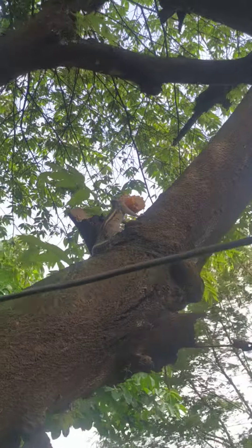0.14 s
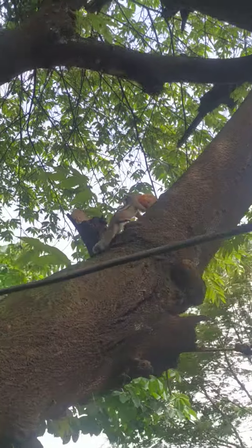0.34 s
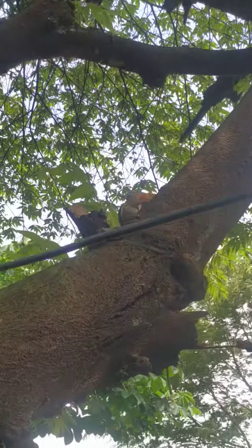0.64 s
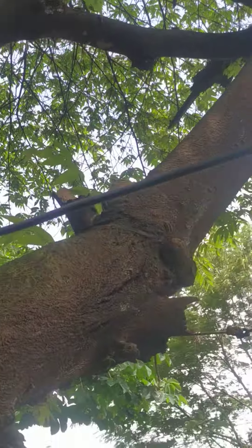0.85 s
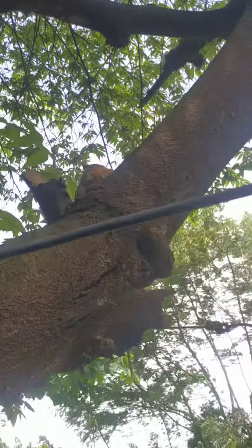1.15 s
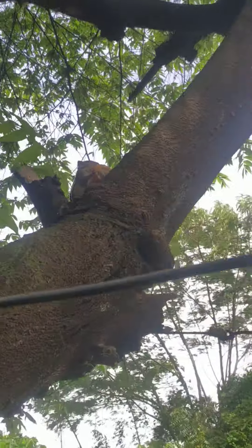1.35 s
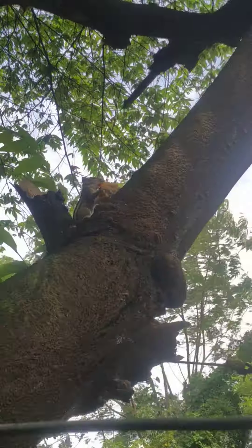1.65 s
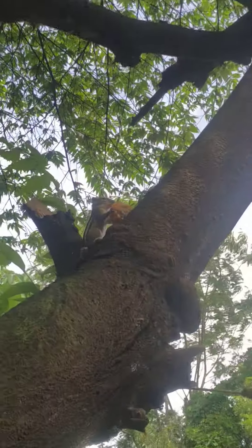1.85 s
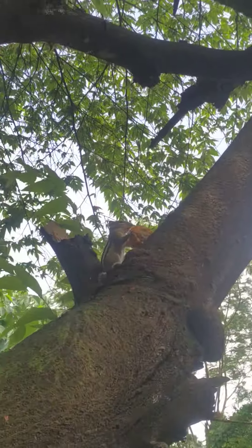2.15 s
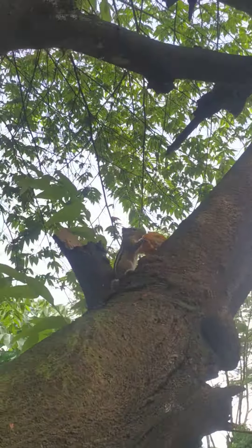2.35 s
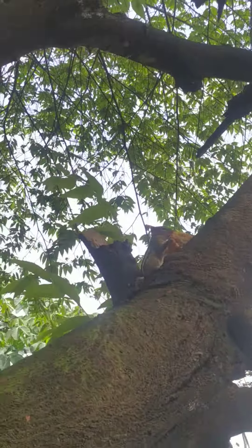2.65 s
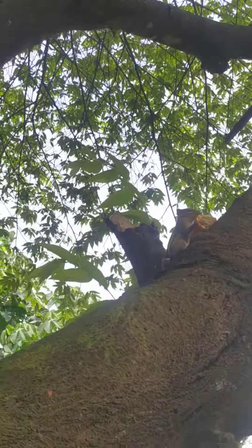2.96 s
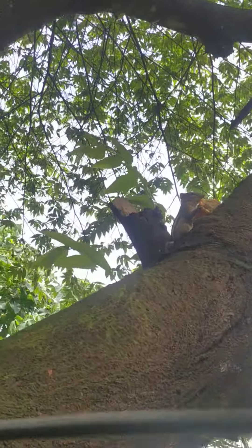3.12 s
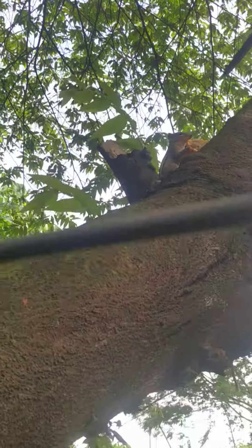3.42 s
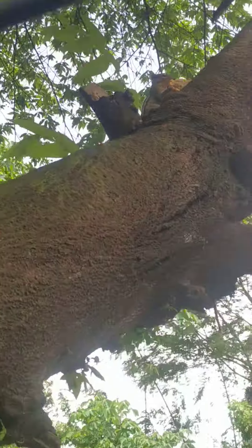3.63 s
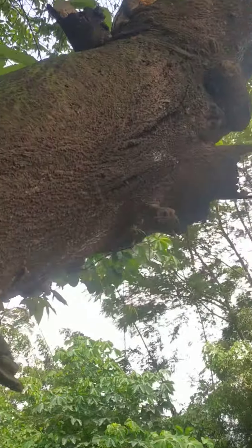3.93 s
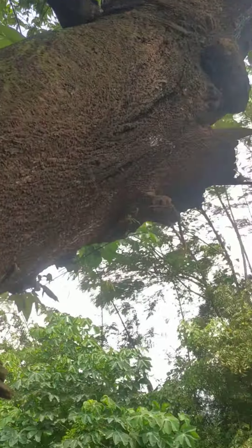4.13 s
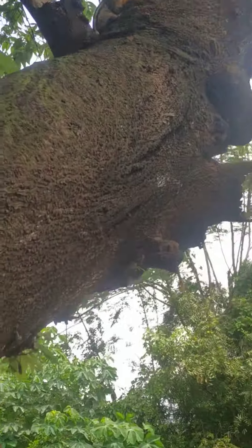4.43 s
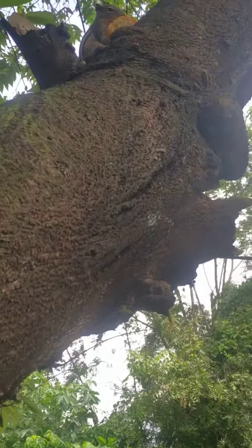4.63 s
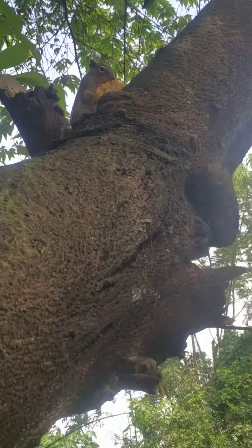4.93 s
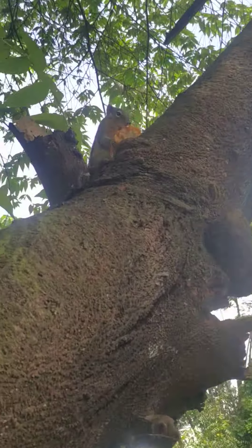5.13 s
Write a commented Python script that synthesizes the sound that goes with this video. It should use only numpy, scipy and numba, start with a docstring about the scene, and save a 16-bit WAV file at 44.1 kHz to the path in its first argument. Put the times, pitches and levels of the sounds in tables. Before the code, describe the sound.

A soft outdoor hush of far traffic and leaves runs throughout, with a faint, thin bird whistle early on. A squirrel in a tree then gives three short, harsh calls, evenly spaced, each a fast rattle with a breathy hiss. The distant bird whistles again, and a finger knocks sharply on the handheld phone and briefly rubs its case, while light wind buffets the microphone toward the end.

```python
"""Three harsh, rattling squirrel calls from a tree, over a soft outdoor hush and a small, far bird.
Tissue slapping shut in the squirrel's throat makes the rattle; air past its teeth adds the hiss.
The microphone is a phone, moved about in the hand: air buffets its two ports, and a finger
knocks beside the right one and rubs the case. Far traffic and leaves make the hush."""
import sys
import numpy as np
from scipy import signal
from scipy.fft import rfft, irfft
from scipy.io import wavfile
from scipy.ndimage import uniform_filter1d
from numba import njit

SR = 44100
rng = np.random.default_rng(int(sys.argv[2]) if len(sys.argv) > 2 else 0)


def persist_wave(psi):
    """Save psi, clipped to +-1, as 16-bit WAV."""
    counts = np.round(np.clip(psi, -1, 1) * 32767).astype(np.int16)
    wavfile.write(sys.argv[1], SR, np.atleast_2d(counts).T)


N = 233020
T = np.arange(N) / SR
FREQS = np.fft.rfftfreq(N, 1 / SR)
SIDES = np.array([[.5], [-.5]])  # splits a left-minus-right difference between the ports


def squirrel(effort_peak=0.59, slack_rough=0.6, hiss_follow=0.77, lead_in_db=-3, catch_s=0.011):
    """The calls at the animal's mouth: one arch of effort drives rattle and hiss; slack is rougher."""
    # calls: t/s, length/s, airy lead-in/s, rattle level/dB, hiss level/dB, drop at slack effort/dB,
    # roughness/0-1, teeth resonance f/Hz, its gain/ratio, brightness/dB
    squirrel_calls = [(2.013, 0.356, 0.035, -36, -46, -4.5, 0.1, 4740, 0.85, 2),
                      (2.731, 0.34, 0.061, -38, -46, -1, 0.12, 4330, 2.4, -4.5),
                      (3.554, 0.34, 0.011, -32.5, -42, -8, 0.04, 4404, 0.44, 1.5)]
    calls = np.array(squirrel_calls)
    nearest_call = np.abs(T - (calls[:, :1] + calls[:, 1:2] / 2)).argmin(axis=0)
    (start, length, lead_in, rattle_db, hiss_db, drop_db, rough,
     teeth_hz, teeth_gain, bright_db) = calls[nearest_call].T
    t = T - start
    slack = np.interp(t / length, [0, effort_peak, 1], [1, 0, 1]) ** 1.51
    pulses, airflow = throat_pulses(np.clip(rough + slack_rough * slack, 0, 1))
    rattle = throat_and_mouth(pulses, nearest_call)
    rattle *= swell(t, length, attack_s=0.066, release_s=0.066)
    hiss = teeth_hiss(airflow, teeth_hz, teeth_gain, bright_db)
    hiss *= swell(t, length, attack_s=0.056, release_s=0.099)
    catch_db = np.interp(t - lead_in, [0, catch_s], [lead_in_db, 0])  # the rattle starts weak
    return (rattle * undb(rattle_db + catch_db + drop_db * slack)
            + hiss * undb(hiss_db + hiss_follow * drop_db * slack))


def throat_pulses(rough, jitter=0.012, scatter_db=0.5, puff_cycles=0.93, rasp=4.3):
    """Tissue slaps shut about 80 times a second; gives rough pulses and the airflow beating with them."""
    # slap rate, one curve per call: t/s, f/Hz
    pulse_rate = [
        [(2.08, 79.26), (2.13, 79.26), (2.224, 80.3), (2.29, 77.87)],
        [(2.8, 79.83), (2.86, 82.43), (2.9, 82.5), (2.945, 80.8)],
        [(3.62, 79.8), (3.67, 83.3), (3.742, 83.7), (3.79, 83.5)],
    ]
    # two weaker rebounds after each slap: delay/cycles, size/ratio
    rebounds = [(0.184, 0.17), (0.478, 0.42)]
    rate_hz, = curves(np.vstack(pulse_rate))
    phase = np.cumsum(rate_hz * (1 + jitter * rough * walk(80))) / SR
    cycle = phase.astype(int)
    size = undb(scatter_db * rng.standard_normal(cycle[-1] + 1))[cycle]
    bounces = sum(gain * np.diff(np.floor(phase - at), prepend=-1) for at, gain in rebounds)
    slaps = np.diff(cycle, prepend=0) + bounces
    puff = np.exp(-(phase % 1) / puff_cycles)
    breath = unit(puff * rng.standard_normal(N))
    return size * (unit(slaps) + rasp * rough * breath), size * puff


def throat_and_mouth(pulses, nearest_call, mouth_width_hz=330.0):
    """The pulses ring the throat, shaped anew for each call, and the mouth near 2 kHz."""
    # colour of the rattle: f/Hz, level/dB
    throat_colour = [(350, -28.5), (550, -13.5), (800, -4.5), (1050, -8.5), (1250, -7.5), (1580, -4),
                     (1730, -1), (2050, -0.5), (2380, -3.5), (2650, -13.5), (3300, -20), (6000, -60)]
    # four throat resonances, one row per call: f/Hz, boost/dB
    throat_peaks = [
        [(900, 2), (1380, 2), (1800, 1.5), (2230, 2)],
        [(850, -4), (1420, 4), (1870, 1.5), (2200, 1)],
        [(860, 1.5), (1380, 6.5), (1830, 7), (2220, 4.5)],
    ]
    # those four resonances: width/Hz
    widths_hz = [90, 100, 99, 170]
    # mouth resonance moving with the jaw, one curve per call: t/s, f/Hz
    mouth_path = [
        [(2.05, 1995), (2.1, 1840), (2.21, 1980), (2.27, 2280), (2.35, 2130)],
        [(2.78, 1820), (2.93, 1880), (2.975, 2230), (3.05, 2070)],
        [(3.585, 1870), (3.635, 2162), (3.7, 1940), (3.77, 1960), (3.825, 2200), (3.88, 2024)],
    ]
    throat = colour(pulses, throat_colour)
    peaks = np.transpose(np.array(throat_peaks, float), (1, 2, 0))
    for (hz, boost_db), width_hz in zip(peaks, widths_hz):
        ring = resonance(throat, hz[nearest_call], float(width_hz))
        throat = throat + (undb(boost_db) - 1)[nearest_call] * ring
    mouth_hz, = curves(np.vstack(mouth_path))
    return even(throat + resonance(throat, mouth_hz, mouth_width_hz), size=1100)


def teeth_hiss(airflow, teeth_hz, teeth_gain, bright_db, steady_air=0.21, width_hz=220.0):
    """Puffs of air hiss out past the teeth; the gap rings at one resonance and a weaker, higher one."""
    # colour of the hiss: f/Hz, level/dB
    hiss_colour = [(2000, -17), (3300, -55), (3800, 2), (4400, 1.5), (4950, 0.5), (5500, 2.5), (7000, 1.5),
                   (9000, 1), (10000, -3.5), (12000, -2), (13300, -17), (15000, -11), (16000, -37)]
    air = colour((steady_air + airflow ** 1.4) * rng.standard_normal(N), hiss_colour)
    treble = signal.sosfiltfilt(signal.butter(2, 8000, "high", fs=SR, output="sos"), air)
    gap = resonance(air, teeth_hz.copy(), width_hz) + 0.38 * resonance(air, 1.317 * teeth_hz, width_hz)
    return even(air + (undb(bright_db) - 1) * treble + teeth_gain * gap, size=2600)


def tree_to_ports(voice, left_lag_s=0.00042, direct_db=-5.5, near_db=-2, far_db=-11, far_pan_db=5):
    """Direct sound, close scatter from trunk and limbs, and a short canopy tail, mostly on the left."""
    direct = np.array([delay(voice, left_lag_s), voice])
    reflected = colour(voice, [(2500, 1.3), (12000, 0.68)])
    near = shifting_scatter(reflected, t60=0.1, onset_s=0.001, rate=4.535)
    far = undb(far_db + far_pan_db * SIDES) * foliage(reflected, t60=0.33, onset_s=0.026)
    left, right = undb(direct_db) * direct + undb(near_db) * near + far
    # each port has its own colour; the left one faces away and loses the top
    return np.array([colour(left, [(1800, -0.96), (2300, 2.0), (4000, -2.6), (8500, -1.1), (12000, -6)]),
                     colour(right, [(1800, 1.0), (2300, -1.5), (4000, 0.74), (8500, 0.47), (12000, 3)])])


def shifting_scatter(x, t60, onset_s, rate, count=4):
    """Scatter whose pattern keeps changing as the phone moves."""
    weights = np.array([walk(rate) for _ in range(count)])
    weights = weights / np.sqrt(np.sum(weights ** 2, axis=0))
    return sum(w * foliage(x, t60, onset_s) for w in weights)


def foliage(x, t60, onset_s):
    """Diffuse scatter from leaves and trunks, different at each port."""
    t = T[:SR]
    tail = rng.standard_normal((2, SR)) * undb(-60 * t / t60) * np.minimum(t / onset_s, 1)
    return signal.fftconvolve(x[None], unit(tail) / np.sqrt(SR), axes=1)[:, :N]


def knocks(ring_db=2.5, click_db=3.0, far_port_db=-27, scuff_db=-39, scuff_s=0.049):
    """A fingertip clicks on the case, squeezes the air in the right port, then scuffs as it settles."""
    # finger knocks: t/s, relative level/dB, click offset/dB, contact time/s
    taps = [(4.2922, 0, 6, 0.00048), (4.3272, -17, -34, 0.0017)]
    # what the phone rings with: f/Hz, relative level/dB, t60/s
    case_modes = [(243, 0, 0.025), (350, -28, 0.0074), (780, -6.5, 0.0057), (1670, -7.5, 0.0052)]
    # colour of the click: f/Hz, level/dB
    click_colour = [(100, -34), (600, -0.5), (2500, 1.5), (4000, -10.5), (6500, -10), (8500, -29),
                    (12000, -19), (16000, -27)]
    ring, clicks = np.zeros(N), np.zeros(N)
    for s, db, tick_db, contact_s in taps:
        t = np.maximum(T - s, 0)
        push = undb(db) * (1 - np.exp(-t / contact_s))
        for hz, mode_db, t60 in case_modes:
            ring += push * undb(mode_db - 60 * t / t60) * np.cos(2 * np.pi * hz * (t - .0003))
        clicks[int(s * SR)] += undb(db + tick_db)
    settling = np.interp(T - taps[0][0], [0, 0.7 * scuff_s, scuff_s], [.6, 1, 0], left=0)
    skin = colour(rng.standard_normal(N), [(100, -14), (300, 3.0), (700, -5.0), (2500, -29), (6000, -57)])
    scuff = settling * unit(skin)
    right = undb(ring_db) * ring + undb(click_db) * colour(clicks, click_colour) + undb(scuff_db) * scuff
    return np.array([undb(far_port_db) * delay(right, 0.002), right])


def rubs(grain_db=1.5, left_mid_db=6):
    """Skin slides over the case in short, grainy strokes, with more midrange at the left port."""
    # finger strokes: t/s, rise/s, hold/s, fall/s, level/dB
    strokes = [(0.678, 0.035, 0.012, 0.045, -53), (0.7215, 0.003, 0.003, 0.008, -57),
               (4.425, 0.045, 0.037, 0.19, -51), (4.685, 0.009, 0.038, 0.073, -43.5)]
    # colour of skin on the case: f/Hz, level/dB
    rub_colour = [(600, -18), (1400, 6.5), (2200, 3), (4000, -1.5), (6000, -1), (8000, 0.5), (11000, -6),
                  (15000, -9.5)]
    left, right = colour(rng.standard_normal((2, N)) * undb(grain_db * walk(400)), rub_colour)
    left = colour(left, [(900, 0.37), (2200, left_mid_db), (7000, 2.2), (11000, -1)])
    envelope = sum(undb(db) * np.interp(T, s + np.cumsum([0, rise, hold, fall]), [0, 1, 1, 0]) ** 2
                   for s, rise, hold, fall, db in strokes)
    return unit(np.array([left, right])) * envelope


def wind(gain_db=2.5, flutter_db=2, takeover_db=-35):
    """Eddies buffet each port on its own; in a stronger stream smaller, faster ones take over."""
    # air stream over the moving phone: t/s, relative level/dB, left minus right/dB
    air_stream = [(0, -52.5, -5), (0.85, -51.5, 0), (1.55, -53.5, -2.5), (2.15, -48, -4), (2.7, -52.5, -1),
                  (3.65, -45, 3), (3.85, -42, 10), (4.08, -42, 4.5), (4.22, -45.5, 2), (4.58, -43, 0),
                  (4.9, -39.5, 11), (5.28, -44.5, 1)]
    # single gusts: t/s, length/s, level/dB, left minus right/dB
    single_gusts = [(0.09, 0.2, -53, -12), (2.244, 0.078, -42.5, -2), (4.13, 0.063, -32.5, 0.5),
                    (4.372, 0.18, -38.5, 18.5), (4.47, 0.036, -42, -20)]
    # colour of the slow eddies: f/Hz, level/dB
    slow_colour = [(10, -14.5), (20, 2), (42, 4), (70, -7.5), (110, -13), (200, -30), (400, -57),
                   (1500, -89)]
    # colour of the fast eddies: f/Hz, level/dB
    fast_colour = [(30, -3.5), (85, 5.5), (130, -4), (190, -11), (260, -25), (400, -36), (1500, -64)]
    level_db, pan_db = curves(air_stream)
    stream = undb(gain_db + level_db + pan_db * SIDES + flutter_db * np.array([walk(13), walk(14)]))
    gusts = sum(undb(db + pan * SIDES) * np.exp(-(2 * (T - s) / length) ** 2)
                for s, length, db, pan in single_gusts)
    strength = np.hypot(stream, gusts)
    slow = even(colour(rng.standard_normal((2, N)), slow_colour), size=5000)
    fast = even(colour(rng.standard_normal((2, N)), fast_colour), size=5000)
    fast_share = strength ** 2 / (strength ** 2 + undb(takeover_db) ** 2)
    return strength * (slow * np.sqrt(1 - fast_share) + fast * np.sqrt(fast_share))


def bird(waver=0.025, canopy_db=5):
    """Thin falling whistles from far off, smeared by the canopy."""
    # notes: t/s, length/s, start f/Hz, end f/Hz, relative level/dB
    notes = [(0.992, 0.07, 5150, 4450, -55.5), (1.045, 0.07, 4520, 4280, -64),
             (1.085, 0.036, 7650, 6660, -63.5), (3.984, 0.05, 6480, 6300, -65.5),
             (4.047, 0.039, 5700, 5600, -65), (4.113, 0.07, 4830, 4730, -61.5),
             (4.155, 0.04, 4600, 4250, -62), (4.184, 0.04, 4170, 4050, -61)]
    song, wobble = np.zeros(N), 1 + waver * walk(250)
    for s, length, start_hz, end_hz, db in notes:
        progress = np.clip((T - s) / length, 0, 1)
        hz = (start_hz + (end_hz - start_hz) * progress) * wobble
        song += undb(db) * np.sin(np.pi * progress) * np.sin(2 * np.pi * np.cumsum(hz) / SR) * np.sqrt(2)
    return .5 * song + foliage(song, t60=0.24, onset_s=0.0016) * undb(canopy_db)


def hush(start_db=-48.5, fade_db_per_s=-0.3856, flicker_db=0.65, swell_db=1.7):
    """Far traffic rumble, alike at both ports, under the smooth hiss of leaves."""
    # colour of the hush: f/Hz, level/dB
    hush_colour = [(40, -14), (110, -3), (170, -3), (260, -1), (380, -5.2), (520, -7), (1000, -7.5),
                   (1700, -10), (2250, -9.5), (3200, -12.5), (7000, -16), (10000, -19), (13000, -22),
                   (16000, -29)]
    # how alike the two ports hear it: f/Hz, likeness/0-1
    port_likeness = [(30, 0.47), (130, 1), (290, 0.91), (640, 0.77), (1400, 0.037), (5000, 0.015)]
    # its balance: f/Hz, left minus right/dB
    balance = [(60, 1.5), (400, -2), (1300, 1.5), (2400, 3), (4400, 2), (15000, -1.5)]
    likeness = np.clip(across(port_likeness), 0, 1)
    mid, side = rfft(rng.standard_normal((2, N)))
    air = mid * np.sqrt(1 + likeness) + 2 * SIDES * side * np.sqrt(1 - likeness)
    air *= undb(across(hush_colour) + SIDES * across(balance))
    bass = 1 / (1 + (FREQS / 400) ** 2)
    rumble = irfft(air * bass, N) * undb(swell_db * walk(7.6))
    leaves = irfft(air * (1 - bass), N) * undb(flicker_db * walk(13))
    return unit(rumble + leaves) * undb(start_db + fade_db_per_s * T)


def undb(db):
    """Decibels to gain."""
    return 10 ** (np.asarray(db) / 20)


def unit(x):
    """Scale to rms 1."""
    return x / np.sqrt(np.mean(x ** 2))


def even(x, size):
    """Hold the rms at 1 over about size samples."""
    return x / np.sqrt(uniform_filter1d(x ** 2, size=size))


def swell(t, length, attack_s, release_s):
    """Rise, hold and fall between 0 and length s."""
    return np.clip(np.minimum(t / attack_s, (length - t) / release_s), 0, 1)


def curves(table):
    """Each column of a table, joined by straight lines in time."""
    s, *columns = np.transpose(table)
    return [np.interp(T, s, c) for c in columns]


def across(points):
    """(Hz, value) points joined on a log-frequency axis."""
    hz, value = np.transpose(points)
    return np.interp(np.log(FREQS + 1), np.log(hz), value)


def colour(x, points):
    """Causal filter with the given (Hz, dB) outline."""
    cepstrum = irfft(np.log(undb(across(points))), N)
    cepstrum[1:N // 2] *= 2
    cepstrum[N // 2 + 1:] = 0
    return irfft(rfft(x) * np.exp(rfft(cepstrum)), N)


def delay(x, seconds):
    """The same sound, later."""
    return irfft(rfft(x) * np.exp(-2j * np.pi * FREQS * seconds), N)


def walk(rate):
    """Random levels held 1 / rate s and slewed twice; spread 1."""
    hold = int(SR / rate)
    steps = np.repeat(rng.standard_normal(N // hold + 1), hold)
    return unit(uniform_filter1d(uniform_filter1d(steps, hold), hold)[:N])


@njit
def resonance(x, hz, width):
    """State-variable band-pass with a moving centre."""
    y, band, low = np.empty(len(x)), 0., 0.
    for i in range(len(x)):
        g, damping = np.tan(np.pi * hz[i] / SR), width / hz[i]
        v = (band + g * (x[i] + 1e-18 - low)) / (1 + g * (g + damping))
        band, low, y[i] = 2 * v - band, low + 2 * g * v, damping * v
    return y


def scene():
    """Everything that reaches the two ports."""
    return tree_to_ports(squirrel()) + bird() + knocks() + rubs() + wind() + hush()


def record(dry):
    """The phone cuts the top above 15.8 kHz."""
    return signal.sosfilt(signal.ellip(10, .2, 70, 15800, fs=SR, output="sos"), dry)


dry = scene()
out = record(dry)
persist_wave(out)
```